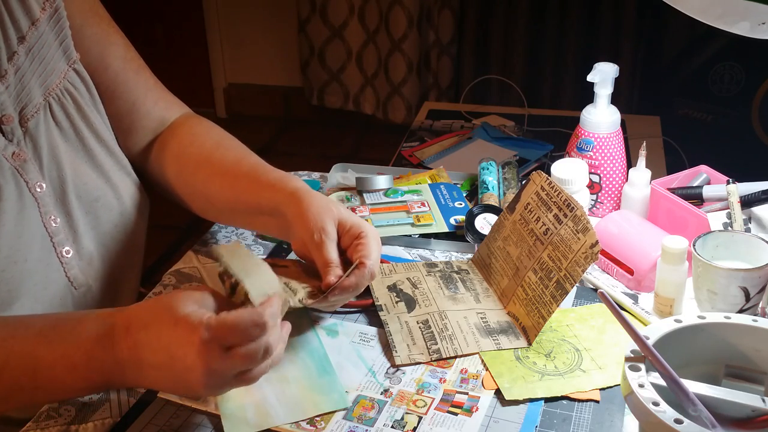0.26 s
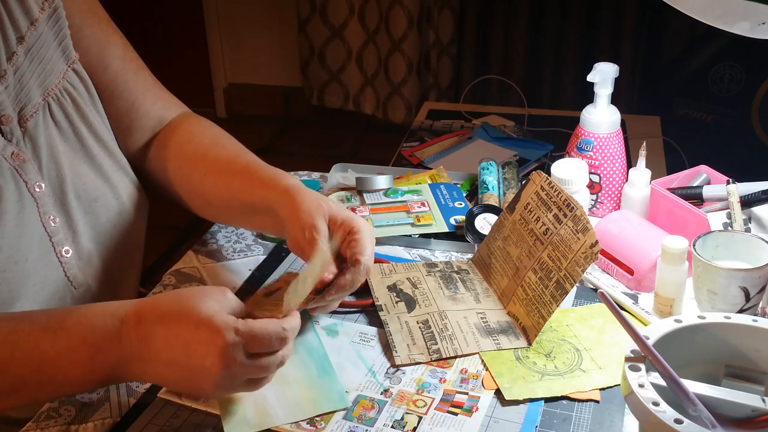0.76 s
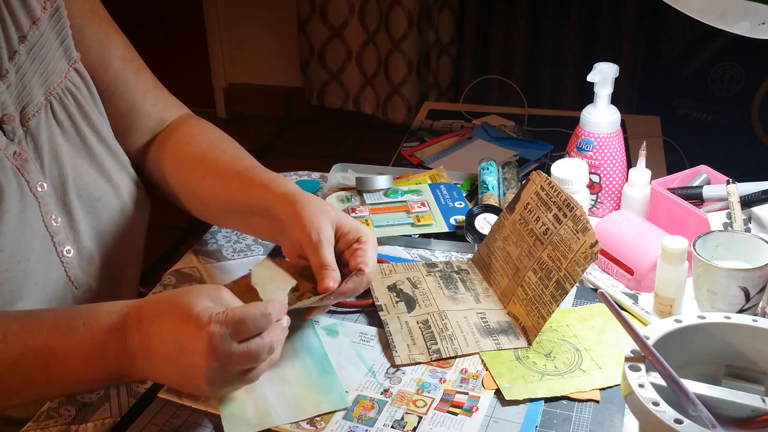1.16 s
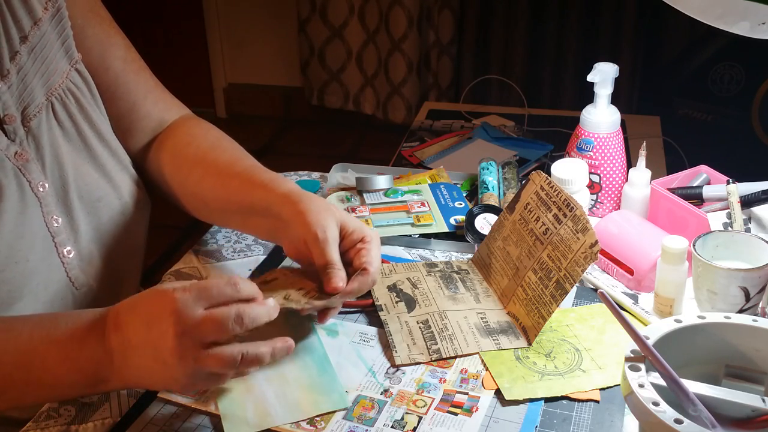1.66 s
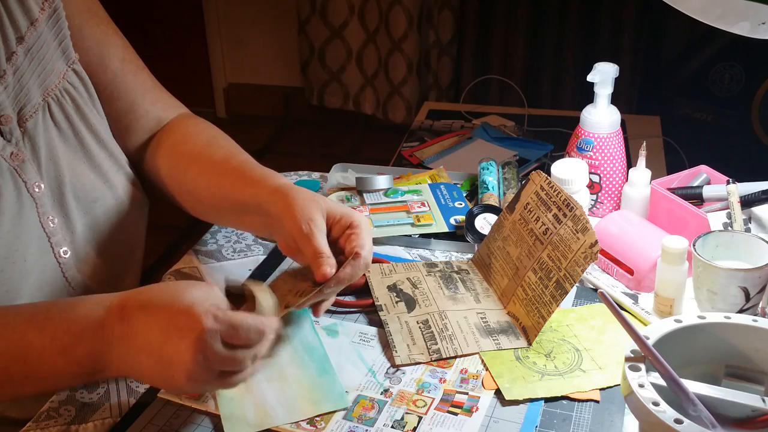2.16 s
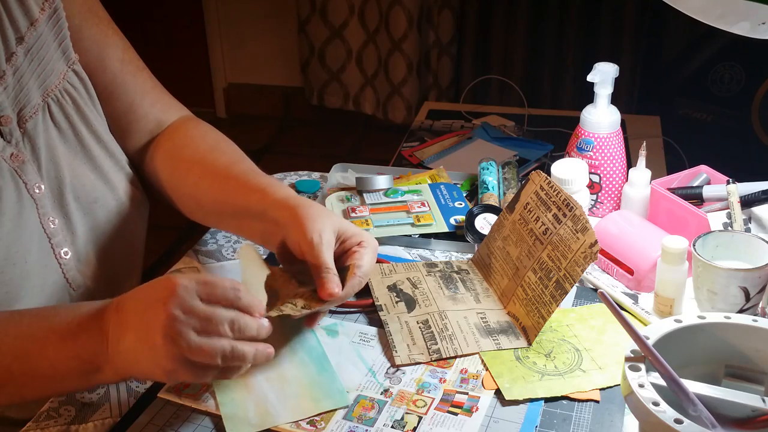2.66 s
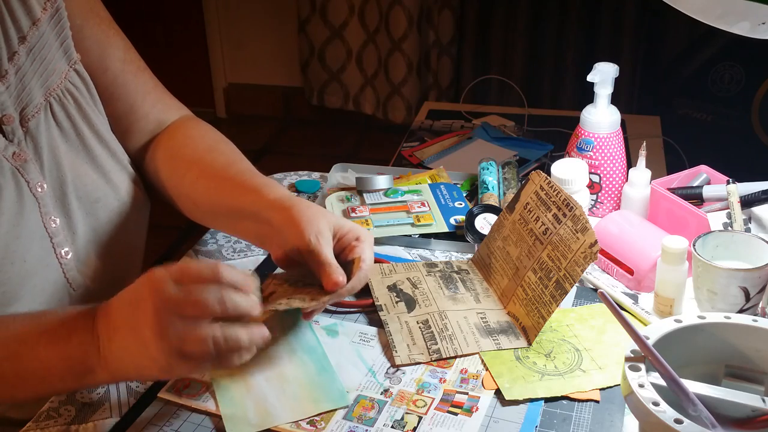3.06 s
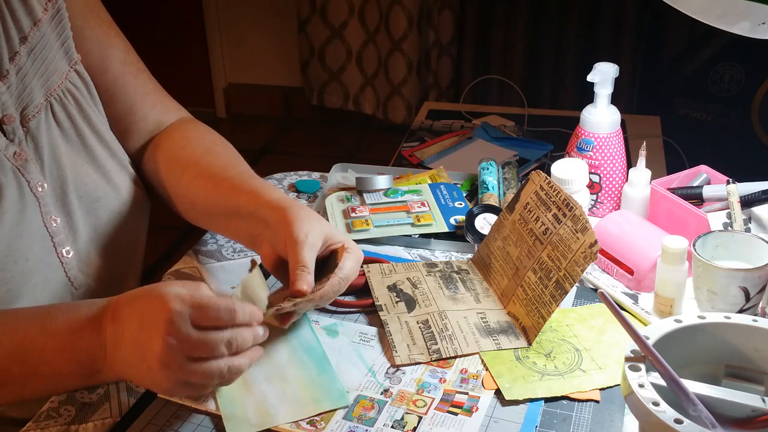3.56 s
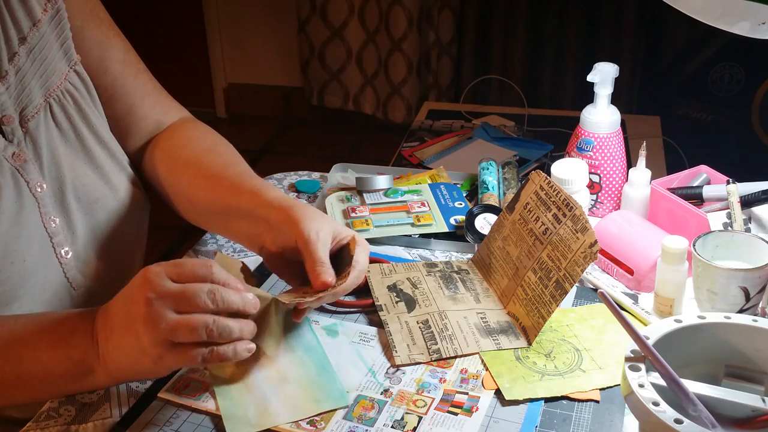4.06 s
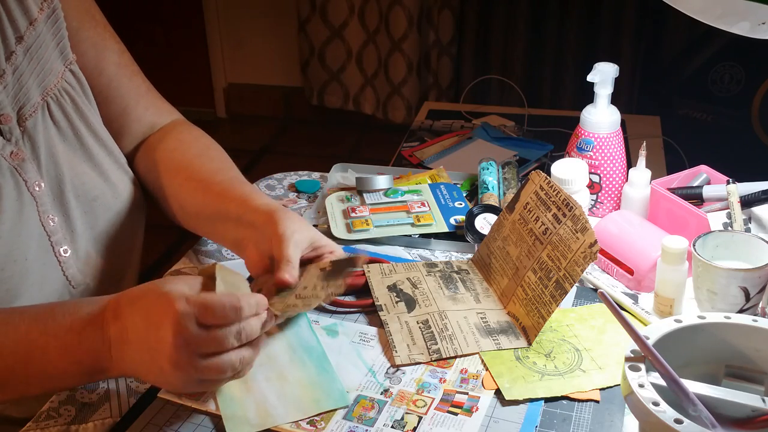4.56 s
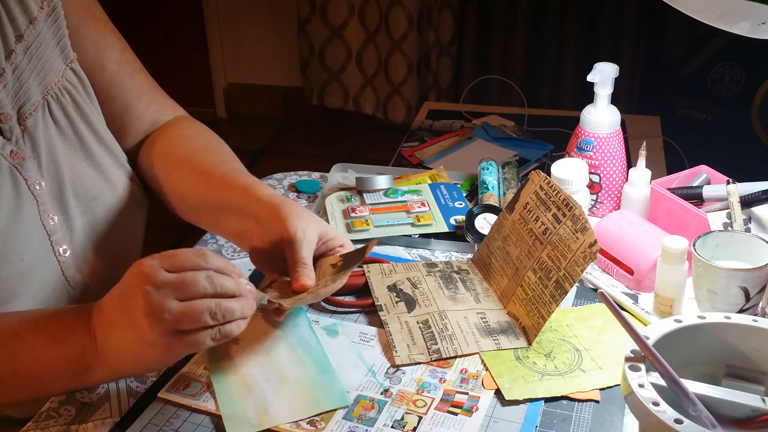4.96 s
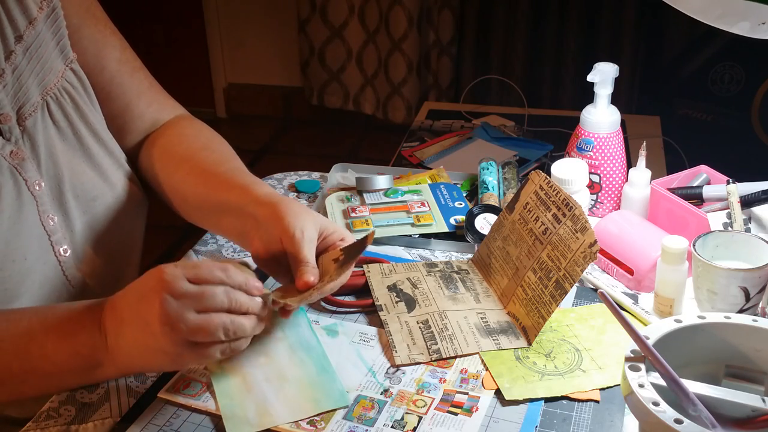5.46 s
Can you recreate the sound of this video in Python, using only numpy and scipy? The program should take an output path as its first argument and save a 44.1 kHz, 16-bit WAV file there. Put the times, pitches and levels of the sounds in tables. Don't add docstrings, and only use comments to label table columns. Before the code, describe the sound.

Crisp bursts of paper tearing and crackling, separated by faint finger rubbing and strip rustle, over low indoor hum.

```python
import sys
import numpy as np
from scipy import signal
from scipy.fft import rfft, irfft, next_fast_len
from scipy.io import wavfile
from scipy.ndimage import uniform_filter1d, map_coordinates

SR = 44100
rng = np.random.default_rng(int(sys.argv[2]) if len(sys.argv) > 2 else 0)


def elevation(decibels):
    levels = np.asarray(decibels, float)
    return 10 ** (levels / 20)


def to_wav(s):
    ch = np.atleast_2d(s).T
    pcm = np.round(np.clip(ch, -1, 1) * 32767)
    wavfile.write(sys.argv[1], SR, pcm.astype(np.int16))


N = 252482
FFT_SIZE = next_fast_len(N + SR)
HZ = np.fft.rfftfreq(FFT_SIZE, 1 / SR)


def unit(x):
    return x / np.sqrt(np.mean(x ** 2) + 1e-20)


def along(points, hz):
    f, v = np.transpose(points)
    return np.interp(np.log(hz + 1), np.log(f + 1), v)


def wobble(rate_hz):
    return map_coordinates(rng.standard_normal(N // 40), [np.arange(N) * rate_hz / SR])


def filtered(x, response):
    return irfft(rfft(x, FFT_SIZE) * response, FFT_SIZE)[..., :N]


def causal(spectrum):
    c = irfft(np.log(elevation(along(spectrum, HZ))))
    c = c * np.where(np.arange(len(c)) < len(c) // 2, 2, 0)
    response = np.exp(rfft(c) - c[0] / 2)
    return response / np.sqrt(np.mean(np.abs(response) ** 2))


def bell(centre_hz, width_hz):
    return 1j * HZ * width_hz / (centre_hz ** 2 - HZ ** 2 + 1j * HZ * width_hz)


# f/Hz, level/dB
FIBRE_COLOUR = [(1200, -77), (2500, -6.5), (4000, 1), (6000, 0.5), (9000, -3), (12000, -0.5), (14500, -1.5)]
SHEET_COLOUR = [(150, -39.5), (350, -8.5), (700, -2.5), (1200, -4), (2000, -3), (3000, -6.5), (5000, -10.5),
                (14000, -22)]


def paper():
    fibre_db, sheet_db = strokes()
    excitation = rustle(fibre_db, sheet_db) + fibre_snaps() + creases() + buckles()
    colour = np.array([causal(FIBRE_COLOUR), causal(SHEET_COLOUR)])
    return filtered(excitation, colour).sum(axis=0) + table_rumble(sheet_db)


# t/s, length/s, crackle at start/dB, at end/dB, flexing re crackle/dB
PULLS = [(.127, 0.064, -37, -24.5, -17), (0.325, 0.089, -44.5, -47, -10), (1.404, 0.0046, -39, -37, -14),
         (1.47, 0.0026, -39.5, -43.5, -7.5), (1.507, 0.047, -44.5, -40, -8.5),
         (1.698, 0.11, -35.5, -33, -5.5), (1.95, 0.024, -51, -45, -2), (2.621, 0.029, -45, -31, -12.5),
         (2.767, 0.009, -26, -31, -15), (2.795, .006, -21, -27.5, -13), (2.845, 0.072, -44.5, -43, -9.5),
         (2.93, 0.04, -25.5, -25.5, -11), (2.98, .12, -30.5, -34, -10), (3.756, 0.032, -30, -33, -13),
         (3.8, 0.053, -33, -37, -13), (3.883, 0.054, -29, -31, -12.5), (3.978, 0.057, -37, -27.5, -9.5),
         (4.04, .08, -29.5, -32, -12), (4.856, .01, -31, -31, -14.5), (4.945, .012, -35, -40, -15),
         (4.963, 0.063, -26.5, -26, -13.5), (5.554, .048, -34.5, -29.5, -13.5),
         (5.69, 0.04, -27.5, -31, -18)]
# peak t/s, fall per 20 dB/s, crackle/dB, flexing/dB
RUBS = [(.028, 0.22, -49.5, -59.5), (.56, 0.1, -56, -66.5), (.606, 0.1, -67, -54), (.735, .14, -53, -58),
        (.86, 0.1, -69, -67), (.958, .12, -60, -66), (1.074, 0.14, -70, -65), (1.274, .015, -58, -78),
        (2.05, 0.05, -75, -60.5), (2.312, 0.07, -50, -48), (2.5, .06, -63, -66), (2.56, 0.1, -68, -63.5),
        (1.03, 0.01, -70, -58), (3.3, 0.14, -70, -67), (3.422, 0.1, -59, -70), (3.486, 0.06, -55, -62.5),
        (3.578, 0.13, -50, -58.5), (3.72, 0.3, -66, -62), (4.295, 0.08, -55.5, -59),
        (4.332, 0.11, -46.5, -60), (4.369, .05, -66, -57), (4.445, 0.14, -54.5, -65.5),
        (4.56, 0.3, -68, -70.5), (4.748, 0.07, -69, -54), (4.845, 0.07, -62, -58.5),
        (4.685, 0.2, -63.5, -74), (5.2, .13, -54.5, -60), (5.405, 0.07, -44.5, -59.5),
        (5.535, 0.13, -51.5, -58), (5.48, .05, -60.5, -62)]
# peak t/s, fall per 20 dB/s, crackle/dB, flexing/dB
MORE_RUBS = [(0.299, 0.0665, -59, -45.5), (.1, 0.08, -70, -59), (4.2, 0.05, -49, -55),
             (2.37, 0.24, -52.5, -64.5), (2.43, 0.3, -58, -65.5), (2.72, 0.2, -45, -56.5),
             (3.21, .08, -57, -63), (3.63, 0.2, -57, -67), (4.26, .06, -64, -66), (4.935, 0.08, -39, -50.5),
             (5.145, 0.12, -56, -57.5), (5.27, 0.14, -68, -63), (5.66, 0.09, -41.5, -52.5)]
RISE_SHARE = 0.67
FLEX_FALLS = 1.22
ATTACK_S = 0.0035
RELEASE_S, RELEASE_GROWS = 0.047, 0.54
IDLE_DB = -85.5


def strokes():
    t = np.arange(0, N, 32) / SR
    power = elevation(2 * np.array([[IDLE_DB - 20], [IDLE_DB]]))
    for s, length_s, start_db, end_db, flex_db in PULLS:
        before = (s - t) / ATTACK_S
        after = (t - s - length_s) / (RELEASE_S + RELEASE_GROWS * length_s)
        away = np.maximum(before, after).clip(0)
        crackle_db = np.interp(t, [s, s + length_s], [start_db, end_db]) - 20 * away
        sheet_db = crackle_db + flex_db - 20 * (FLEX_FALLS - 1) * away
        power = power + elevation(2 * np.array([crackle_db, sheet_db]))
    for s, fall_s, crackle_db, flex_db in [*RUBS, *MORE_RUBS]:
        away = np.maximum((s - t) / RISE_SHARE, t - s) / fall_s
        power = power + elevation(2 * (np.array([[crackle_db], [flex_db]]) - 20 * away))
    return [np.interp(np.arange(N) / SR, t, db) for db in 10 * np.log10(power)]


def rustle(fibre_db, sheet_db):
    clumps_db = 3 * wobble(200) + 1.5 * wobble(60)
    fibre = cracks(2200, spread_db=1.5, clumps_db=clumps_db, life_s=0.0039)
    sheet = cracks(1500, spread_db=1.5, clumps_db=0.59 * clumps_db + 2 * wobble(90), life_s=0.011)
    return np.array([elevation(fibre_db - 8.5) * dulled(fibre, fibre_db), elevation(sheet_db - 1.0) * sheet])


def cracks(per_s, spread_db, clumps_db, life_s):
    hit = rng.random(N) < per_s / SR
    size_db = spread_db * np.minimum(rng.exponential(size=N), 4)
    size = hit * elevation(size_db) * elevation(clumps_db)
    t = np.arange(SR // 40) / SR
    power = signal.fftconvolve(size ** 2, elevation(-120 * t / life_s))[:N]
    return unit(np.sqrt(np.abs(power)) * rng.standard_normal(N))


DULL_DB, CRISP_DB = -70, -36.5


def dulled(x, db):
    soft = uniform_filter1d(x, size=3)
    crispness = np.clip((db - DULL_DB) / (CRISP_DB - DULL_DB), 0.2, 1.2)
    return soft + crispness * (x - soft)


# t/s, peak/dB
SNAPS = [(.1311, -22), (0.1496, -18), (.1635, -19), (.1791, -16), (0.3267, -15), (.3586, -27),
         (1.3857, -30), (1.4034, -22), (1.729, -10.5), (1.765, -18), (1.8421, -17.5), (2.7692, -15),
         (2.806, -13), (2.9, -24), (2.9315, -15), (2.975, -16), (3.0821, -15.5), (3.1739, -23),
         (3.7352, -27), (3.7559, -17.5), (3.874, -14.5), (3.8858, -17.5), (2.795, -11), (3.9802, -16.5),
         (4.0098, -25), (4.0342, -17), (4.0767, -14.5), (4.855, -16.5), (4.9286, -19.5), (4.9447, -18.5)]


def fibre_snaps():
    return give_way([(s, db, 1650, -30, 0.0065) for s, db in SNAPS])


# t/s, peak/dB, flap f/Hz
CREASES = [(.016, -36.5, 1830), (.032, -24, 1800), (0.5484, -46, 1830), (.5869, -32, 923),
           (1.074, -42, 630), (1.4694, -26, 1100), (1.509, -27.5, 759), (1.5306, -24, 780),
           (1.5496, -27.5, 751), (1.7015, -22, 600), (1.8005, -18, 1740), (1.879, -24.5, 1690),
           (2.3062, -30, 1260), (2.6468, -13, 1260), (3.0036, -18, 1000), (3.014, -28, 1550),
           (3.0525, -20, 1980), (3.1028, -17.5, 650), (3.7722, -25.5, 1970), (3.7885, -5, 755),
           (3.837, -17, 1810), (3.9404, -23, 1730), (4.9688, -17.5, 2190), (5.1923, -30, 2340),
           (5.3984, -37, 657), (5.5162, -37.5, 1510), (5.5586, -29.5, 649), (5.5768, -21, 750),
           (5.5982, -21, 1730), (5.694, -24, 1830)]


def creases():
    return give_way([(s, db, flap_hz, -20, 0.0074) for s, db, flap_hz in CREASES])


# t/s, peak/dB, flap f/Hz, flap re crack/dB
POPS = [(.0772, -48.5, 930, -1), (.605, -47, 2610, -2), (.6838, -52.5, 756, 0), (.7342, -42.5, 1930, -2),
        (.855, -54, 743, -0.5), (.9433, -59.5, 654, -0.5), (.9621, -58, 1780, 13), (.9973, -43, 596, -14),
        (1.125, -55, 746, -9), (1.707, -30.5, 720, -9), (2.0661, -56, 2050, .6), (2.2782, -51, 2110, -4),
        (2.389, -41, 738, -13), (2.5072, -51, 1120, -12), (2.557, -60.5, 653, 11.5),
        (2.5875, -50, 910, 2.1), (2.6195, -38, 2060, -3.5), (3.041, -20, 1810, -25),
        (3.2874, -54, 910, -5.5), (3.4114, -44, 603, -13.5), (3.456, -53, 619, -9.5),
        (3.5543, -37.5, 859, -11.5), (3.5798, -35.5, 900, -10.5), (4.276, -55, 775, -2.5),
        (4.3238, -39, 1100, -13.5), (4.4584, -39, 2070, -10), (4.5096, -47.5, 751, -9),
        (4.7381, -49, 635, 0), (4.7438, -43.5, 1590, -3), (5.3727, -47, 1000, -8.5)]


def buckles():
    return give_way([(*row, 0.013) for row in POPS])


def give_way(events):
    bright, dull = np.zeros((2, N + SR))
    t = np.arange(SR // 20) / SR
    for s, db, flap_hz, flap_db, t60_s in events:
        noise = rng.standard_normal((3, len(t)))
        fade = elevation(-60 * t / t60_s)
        uneven = elevation(25 * uniform_filter1d(noise[2], size=60))
        trail = fade * uneven * (1 - np.exp(-t / 0.00042))
        front = 0.69 * elevation(-60 * t / 0.00092)
        crack = (trail + front) * noise[0]
        ring = signal.lfilter(*signal.iirpeak(flap_hz, 4.5, SR), noise[1])
        flap = fade ** 0.57 * (noise[1] + 2.93 * ring)
        at = round(s * SR)
        bright[at:at + len(t)] += elevation(db - 5.5) * dulled(crack, db - 12.5) / np.abs(crack).max()
        dull[at:at + len(t)] += elevation(db + flap_db + 7.5) * flap / np.abs(flap).max()
    return np.array([bright[:N], dull[:N]])


# f/Hz, level/dB
FOREARMS = [(25, -8), (60, -5.5), (150, 3.5), (300, -0.5), (600, -40)]


def table_rumble(sheet_db):
    effort_db = uniform_filter1d(sheet_db, size=SR // 4) + 63.5
    rumble = unit(filtered(rng.standard_normal(N), elevation(along(FOREARMS, HZ))))
    return elevation(0.45 * effort_db - 68) * rumble


# f/Hz, t60/s
WALLS = [(200, 0.61), (1000, 0.17), (4000, 0.24), (12000, 0.12)]


def echoes(x, table_db, walls_db):
    late, step = np.zeros((2, N + SR)), SR // 16
    t = np.arange(SR // 5) / SR
    padded = np.pad(x, ((0, 0), (0, step)))
    for at in range(0, N, step):
        hz, s, z = signal.stft(rng.standard_normal((2, len(t))), SR, nperseg=256)
        decay = elevation(-60 * s / along(WALLS, hz)[:, None])
        tail = signal.istft(z * decay, SR, nperseg=256)[1][:, :len(t)] * (t > 0.006)
        clutter = rng.standard_normal((2, len(t))) * elevation(-60 * t / 0.009) * (t > 0.0003)
        answer = elevation(table_db) * unit(clutter) + elevation(walls_db) * unit(tail)
        heard = signal.fftconvolve(padded[:, at:at + step], answer, axes=1)
        late[:, at:at + step + len(t) - 1] += heard
    mid, side = late[0, :N] + late[1, :N], late[0, :N] - late[1, :N]
    side = filtered(side, HZ / np.hypot(HZ, 500))
    return np.array([mid + side, mid - side]) / np.sqrt(4 * len(t))


# f/Hz, level/dB
AIR = [(15, -13), (35, -17), (60, -16), (120, -8), (200, -4), (400, -4.5), (800, -8.5), (1500, -21),
       (3000, -22.5), (7000, -28.5), (10000, -30.5), (14500, -24)]
# f/Hz, correlation/1
AIR_ALIKE = [(60, 1), (290, 0.86), (640, 0.33), (1400, 0.062)]


def room_air():
    turn = np.arccos(np.clip(along(AIR_ALIKE, HZ), -1, 1)) / 2
    response = elevation(along(AIR, HZ)) * [np.cos(turn), np.sin(turn)]
    mid, side = filtered(rng.standard_normal((2, N)), response)
    return elevation(-63.5 + 0.2 * wobble(3.45)) * unit(np.array([mid + side, mid - side]))


# f/Hz, width/Hz, level/dB
DRONES = [(51.2, 10.5, -67.5), (83.3, 6.7, -74), (169, 5.8, -67.5), (228.76, 5.1, -68.5)]


def drones():
    total = np.zeros((2, N))
    for hz, width_hz, db in DRONES:
        noise = rng.standard_normal(N) + 0.65 * rng.standard_normal((2, N))
        total += elevation(db) * unit(filtered(noise, bell(hz, width_hz) ** 2))
    return total


# f/Hz, left/dB, right/dB
WHINES = [(1125, -78, -95), (7240, -83, -102)]


def whines():
    t, total = np.arange(N) / SR, np.zeros((2, N))
    for hz, left_db, right_db in WHINES:
        total += elevation([[left_db], [right_db]]) * np.sin(2 * np.pi * hz * t + 0.52 * wobble(54))
    return total


def scene():
    both = np.tile(paper(), (2, 1))
    direct = filtered(both, np.array([HZ * 0 + 1, np.exp(-2j * np.pi * HZ * 9e-5)]))
    return direct + echoes(both, table_db=0.0, walls_db=-3.5) + room_air() + drones() + whines()


# f/Hz, level/dB
MASKED = [(80, -24), (350, -25), (900, -40), (2500, -25), (4300, -18), (6000, -20), (8000, -40),
          (13000, -23)]


def gated_bands(x):
    frame = dict(fs=SR, window="cosine", nperseg=2048)
    hz, _, z = signal.stft(np.array([x[0] + x[1], x[0] - x[1]]) / 2, **frame)
    power = (np.abs(z[:, :1024]) ** 2).reshape(2, 128, 8, -1).mean(axis=2)
    loudest = power[:, 20:].max(axis=(0, 1))
    kept = power > loudest * elevation(2 * along(MASKED, hz[4:1024:8]))[:, None]
    mask = np.pad(np.repeat(kept, repeats=8, axis=1), ((0, 0), (0, 1), (0, 0)))
    mid, side = signal.istft(z * mask, **frame)[1][:, :N]
    return np.array([mid + side, mid - side])


def band_limit(x):
    return signal.sosfilt(signal.butter(12, 15810, fs=SR, output="sos"), x)


# f/Hz, width/Hz, boost/dB
PORTS = [(7350, 1230, 10), (8480, 1070, 11.5)]
TOP_HZ, SHORT_HZ = 14500, 16300


def record(dry):
    ports = np.array([1 + elevation(db) * bell(hz, width_hz) for hz, width_hz, db in PORTS])
    ports = ports * elevation([[-1.3], [1.3]])
    power = np.sum(filtered(dry, HZ > 6000) ** 2, axis=0)
    jump = power_jump = uniform_filter1d(power, size=128) > 9 * uniform_filter1d(power, size=1024, origin=511)
    opened = np.clip(8 * uniform_filter1d(jump * 1.0, size=256), 0, 1)
    slope = (HZ >= TOP_HZ) * np.clip(SHORT_HZ - HZ, 0, None) / (SHORT_HZ - TOP_HZ)
    top = elevation(-9) * opened * filtered(dry, ports * slope)
    return band_limit(gated_bands(filtered(dry, ports * (HZ < TOP_HZ))) + top)


dry = scene()
out = record(dry)
to_wav(out)
```